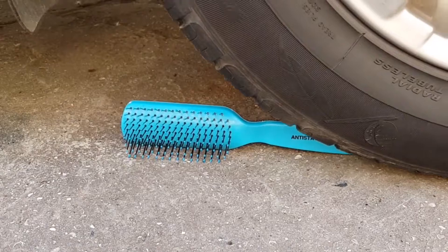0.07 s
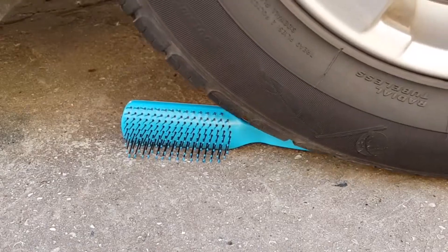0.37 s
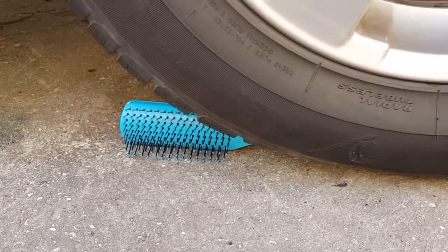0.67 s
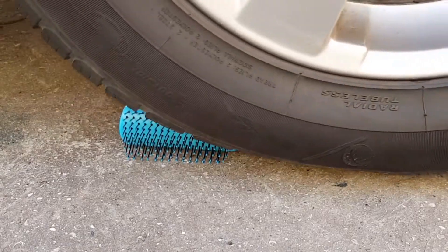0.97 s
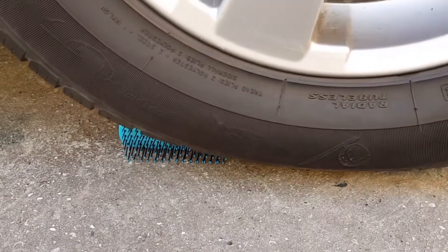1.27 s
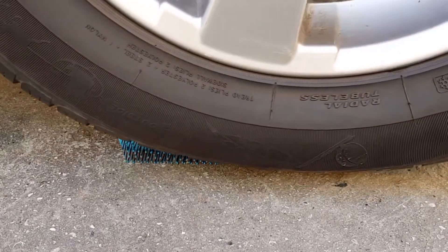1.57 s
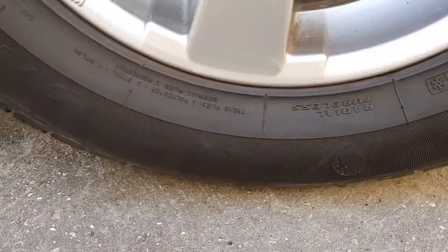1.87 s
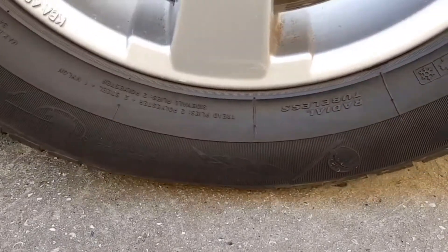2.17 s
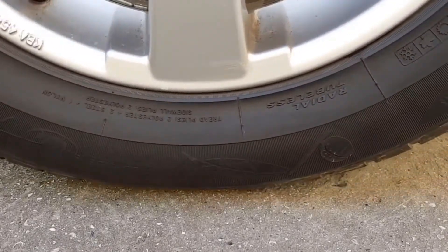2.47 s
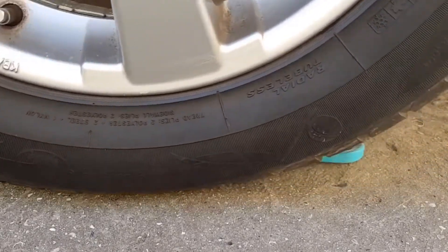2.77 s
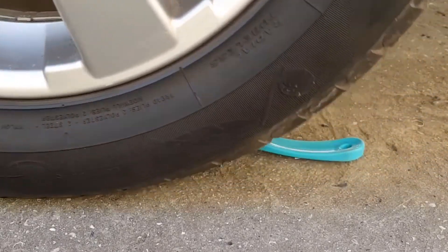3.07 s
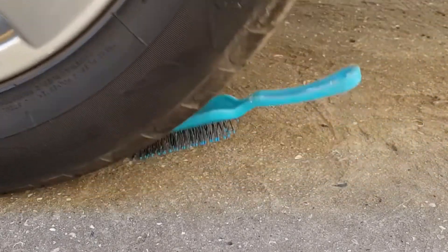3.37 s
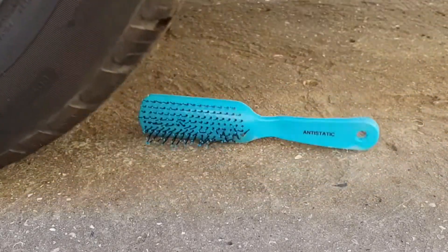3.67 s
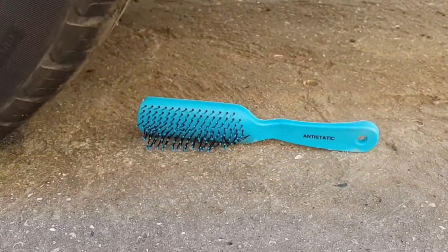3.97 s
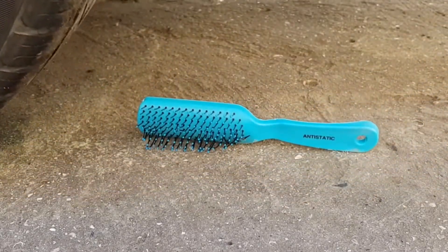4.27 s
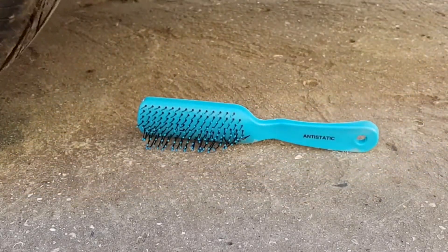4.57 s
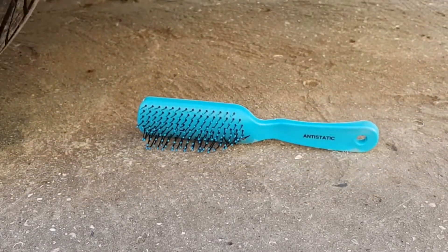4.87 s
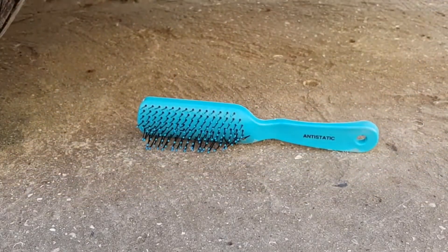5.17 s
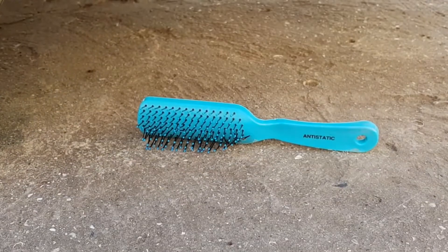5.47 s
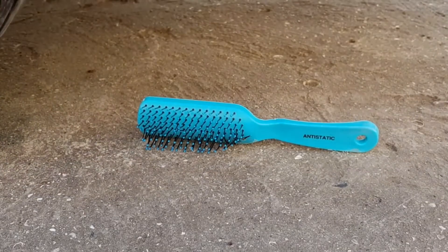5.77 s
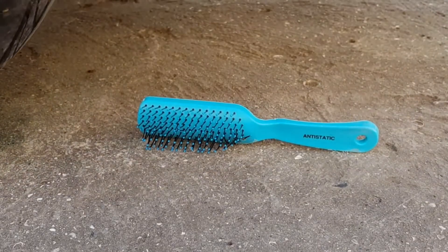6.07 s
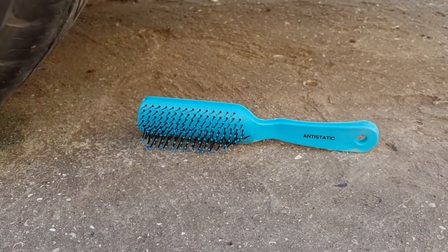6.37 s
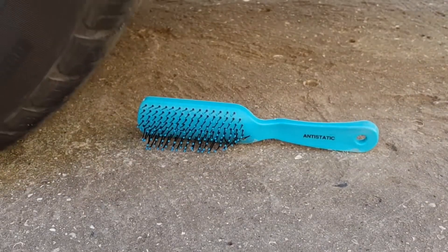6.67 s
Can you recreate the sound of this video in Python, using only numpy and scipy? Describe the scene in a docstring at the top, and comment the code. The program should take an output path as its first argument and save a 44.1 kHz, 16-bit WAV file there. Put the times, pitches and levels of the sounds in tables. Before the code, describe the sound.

A car idles and creeps over a plastic hairbrush, which gives one loud crack, then scrapes and clatters lightly on concrete.

```python
"""A four-cylinder engine idles close by while the car creeps onto a plastic hairbrush on concrete. After a few
ticks the brush gives with one loud crack: the pinned plastic rings, the tyre thumps down, its air cavity hums,
and the automatic gain control ducks. The tyre scrapes on the concrete, the freed brush flicks its bristles and
clatters, while the engine changes colour as the wheel passes. As the gain eases back, the engine sags twice
under the clutch, the second time deeper and with a shudder, then picks up again."""
import sys
import numpy as np
from scipy import signal
from scipy.fft import rfft, irfft, next_fast_len
from scipy.io import wavfile
from scipy.ndimage import uniform_filter1d, minimum_filter1d, map_coordinates

SR = 44100
rng = np.random.default_rng(int(sys.argv[2]) if len(sys.argv) > 2 else 0)


def master(y):
    """Save y as 16-bit WAV."""
    cut = np.clip(np.atleast_2d(y).T, -1, 1)
    pcm = np.round(cut * 32767)  # scale
    wavfile.write(sys.argv[1], SR, pcm.astype(np.int16))


N = 306054

# Table levels are relative, within their own layer.
# the run of snaps as the brush gives way: t/s, level/dB
BRUSH_SNAPS = [(1.9426, -1), (1.9449, -1.5), (1.9526, -11), (1.957, -7), (1.972, -16)]
# pop of the air pushed out by each snap: f/Hz, level/dB, t60/s
POP_MODES = [(277, -5, 0.015), (763, 3, 0.019), (1070, -8.5, 0.0066)]
# ring of the brush pinned under the tyre: f/Hz, level/dB, t60/s
PINNED_MODES = [(390, -15, .08), (535, -3, 0.15), (661, -3.5, 0.14), (757, 4.5, 0.098), (874, -8, 0.28),
                (923, -7, 0.13), (1044, -1, 0.1), (1270, -11, .04), (2060, -5, .07), (2440, -16, 0.088),
                (3050, -7.5, 0.043)]
# tyre carcass and air cavity: f/Hz, level/dB, t60/s
TYRE_MODES = [(62.6, 3, 0.174), (152, 3, 0.18), (223, -4, 0.84), (274, 2.5, .09)]
# colour of the bang scattered under the car: f/Hz, level/dB
SCATTER_EQ = [(30, -15), (60, 5.5), (130, 4.5), (260, 3.5), (480, -3.5), (620, 1.5), (780, -0.5),
              (1020, -8), (1250, -13), (1600, -22.5), (2060, -15.5), (3050, -20), (3900, -29), (6800, -29),
              (8000, -38), (11500, -33.5), (15500, -56)]
# hits of grit, bristles and the loose brush: t/s, click level/dB, pitch/Hz, t60/s, handle ring/dB
CONTACTS = [(1.034, -42.5, 7000, .09, -70), (1.205, -42, 7000, .03, -70), (1.4605, -25, 11000, 0.0068, -70),
            (1.803, -38, 10000, .01, -70), (2.296, -32.5, 4500, 0.026, -53), (2.364, -37, 5500, .02, -60),
            (2.484, -39, 8000, .03, -70), (2.526, -38, 8000, 0.016, -72), (2.597, -39, 6570, 0.022, -70),
            (2.645, -41, 8030, .02, -70), (3.182, -26.5, 1800, .014, -42), (3.386, -36, 4996, 0.022, -60),
            (3.421, -22.5, 4500, 0.013, -44), (3.617, -19.5, 4800, .024, -27),
            (3.696, -39, 9100, 0.043, -70), (3.757, -25.5, 1900, .015, -30)]
# colour of a hard contact: f/Hz, level/dB
CLICK_EQ = [(200, 9), (900, 8), (2500, -5.5), (3400, -5), (4800, -4.5), (7000, -9.5), (8500, -12.5),
            (15500, -8.5)]
# ring of the free handle: f/Hz, level/dB, t60/s
HANDLE_MODES = [(560, 8, 0.038), (1560, -2, .035), (1970, 1, .045), (2250, 0, .03), (2554, -1, 0.046),
                (4030, -5, 0.03), (4800, -2.5, .04), (7250, -1, .03)]
# the tyre scrapes on concrete as the tread lets go: peak t/s, level/dB, time to rise 20 dB/s
TYRE_SCRAPES = [(3.09, -45, .25), (3.19, -44, 0.13), (3.39, -45, .35), (3.63, -46, .12)]
# tufts of bristles springing back: peak t/s, level/dB
BRISTLE_FLICKS = [(3.19, -49), (3.437, -36), (3.628, -45)]

# the clutch drags the engine down: start t/s, slowest t/s, recovered t/s, firing rate drop/Hz
CLUTCH_SAGS = [(4.049, 4.47, 4.8, 1.5), (5.6, 6.249, 6.88, 5.2)]
# exhaust partials: multiple of the firing rate, level/dB
EXHAUST_PARTIALS = [(2.5, -8), (3, 0), (3.5, -11), (4, -7), (4.5, -6), (5, -7.5), (5.5, -7), (6, -9),
                    (6.5, -10), (7, -8), (8, -11.5), (9.5, -10.5), (10, -15.5)]
# colour of the exhaust puffs: f/Hz, level/dB
PUFF_EQ = [(20, -27), (50, -1.5), (70, -2.5), (100, 0.5), (170, 0.5), (250, -6), (360, -5), (420, -17.5),
           (600, -22), (1200, -75)]
# added exhaust colour once the wheel has passed: f/Hz, gain/dB
EXHAUST_EQ_AFTER = [(90, 3.5), (125, -4), (165, -2.5), (225, 3.5), (275, 0.5), (320, -6), (380, -0.5),
                    (600, 3)]
# engine bay noise before and after the wheel passes: f/Hz, level/dB
BAY_EQ_BEFORE = [(220, -22), (380, -7), (552, -5.5), (655, -3), (742, -6.5), (802, -3), (1150, -10),
                 (1260, -4.5), (1430, -11.5), (1720, -12.5), (3750, -21.5), (6880, -26), (8290, -32),
                 (12000, -29), (15700, -34.5)]
BAY_EQ_AFTER = [(220, -45), (380, -9), (411, -12.5), (488, -3), (606, -5.5), (666, -9.5), (719, -5),
                (1050, -7.5), (1450, -9), (1670, -10), (3580, -22.5), (6880, -27), (8040, -33),
                (12400, -30), (15700, -38)]
# ringing metal parts in the bay: f/Hz, half-width/Hz, boost/dB
METAL_RESONANCES = [(1680, 40, 3), (4900, 86, 3.5), (6940, 140, 2)]
# belt and pulley whine before and after the wheel passes: multiple of the firing rate, level/dB
WHINE_BEFORE = [(16.7, -11), (18.13, -11), (21.85, -10.5), (25.35, -13), (33.85, -13), (36, -22),
                (40.4, -21), (46.1, -16), (47.1, -16.5), (54.5, -22)]
WHINE_AFTER = [(18.13, -9.5), (21.75, -10.5), (36, -12), (49.3, -18), (51.2, -15)]
# the car body shakes as the clutch bites: t/s, f/Hz, level/dB, t60/s
BODY_THUDS = [(5.645, 55, -19, 0.28)]

# reverb decay of the yard: f/Hz, t60/s
YARD_DECAY = [(100, .2), (800, .2), (3000, 0.21), (12000, 0.097)]
# stereo width of the noise: f/Hz, left-right correlation
STEREO_LIKENESS = [(60, 0.96), (130, 0.91), (290, 0.79), (640, 0.63), (1400, 0.46), (3100, 0.17),
                   (15000, 0.12)]
# tilt of the image to the left: f/Hz, left minus right/dB
LEFT_TILT = [(60, 0.5), (200, 1), (700, 3), (2400, 2.5), (4400, 4), (15000, 5.5)]

IDLE_HZ = 37.7  # firing rate
PASS_S, PASS_TAKES_S = 2.0, 3.0  # wheel and wing move past and recolour the engine
UNCOVER_S, UNCOVER_TAKES_S = 2.34, 1.46  # the wheel uncovers the underside of the car
BAY_FADE_S, BAY_FADE_DB_PER_S = 4.21, 0.93  # the engine bay draws away
LUG_BELOW_HZ, LUG_RANGE_HZ = 36.63, 2.4  # lugging starts at this firing rate, is full this much lower
BODY_HZ, BODY_HALF_WIDTH_HZ = 66.5, 3  # car body resonance, met by the octave at low engine speed


def crack(peak_db, ring_db, scatter_db, thump_db):
    """The plastic snaps, the tyre drops, and the bang scatters between ground and underbody."""
    first_s = BRUSH_SNAPS[0][0]
    t = np.arange(SR) / SR
    snaps = [(t + first_s - s, db) for s, db in BRUSH_SNAPS]
    pops = sum(amp(db) * ring(POP_MODES, age) for age, db in snaps)
    bursts = sum(amp(db - 60 * np.abs(age) / 0.012) * (age >= 0) for age, db in snaps)
    splinter_eq = [(800, -17), (2000, 3.5), (3100, -2.0), (4000, -13), (6500, -8.5), (8000, -17),
                   (15500, -17)]
    attack = pops + amp(-11) * bursts * noise(splinter_eq, size=SR)
    plastic = amp(ring_db) * ring(PINNED_MODES, t - .0026) * (1 - np.exp(-t / 0.0034))
    # reflections build up for a moment, then die quickly
    bloom = np.minimum(t / 0.0099, 1) * amp(-60 * np.maximum(t - .018, 0) / 0.15)
    scatter = amp(scatter_db) * bloom * noise(SCATTER_EQ, size=SR)
    thump = amp(thump_db) * ring(TYRE_MODES, t - .006) * (1 - np.exp(-t / 0.0094))
    bang = attack / np.abs(attack).max() + plastic + scatter + thump
    out = np.zeros((2, N))
    add(out, first_s, amp(peak_db) * bang / np.abs(bang).max())
    return out


def clatter():
    """Hard little contacts: each clicks around its own pitch and rings the handle most near that pitch."""
    out = np.zeros((2, N))
    t = np.arange(SR // 8) / SR
    for s, db, pitch_hz, t60, ring_db in CONTACTS:
        bandpass = lambda hz: 1 / (1 + .7j * (hz / pitch_hz - pitch_hz / (hz + 1)))
        click = amp(db - 60 * t / t60) * unit(filtered(noise(CLICK_EQ, size=len(t)), bandpass))
        handle = amp(ring_db) * filtered(ring(HANDLE_MODES, t), bandpass)
        add(out, s, click + handle)
    return out


def bristles():
    """Bristles spring back in a bright, grainy spray; the tyre scrapes on concrete with a duller rasp."""
    springing = sum(swell(s, db, rise_s=0.053, fall_s=0.068) for s, db in BRISTLE_FLICKS)
    sliding = sum(swell(s, db, rise_s, fall_s=0.2) for s, db, rise_s in TYRE_SCRAPES)
    flick_eq = [(700, -19), (2500, -1), (5000, -3), (8000, -5), (12000, -3), (15500, -6)]
    scrape_eq = [(300, -16), (800, 2.0), (1400, -3.0), (2000, -8), (3000, -13), (8000, -28)]
    flicks = unit(amp(3.65 * wobble(700))) * noise(flick_eq)
    scrape = unit(amp(2.7 * wobble(300))) * noise(scrape_eq)
    return springing * flicks + sliding * scrape


def engine():
    """One firing rate drives boom, exhaust and bay; their mix follows engine speed and the car's creep."""
    t = np.arange(N) / SR
    firing_hz = firing_rate(sharpness=1.2)
    phase = 2 * np.pi * np.cumsum(firing_hz) / SR
    passed = np.clip((t - PASS_S) / PASS_TAKES_S, 0, 1)
    uncovered = np.clip((t - UNCOVER_S) / UNCOVER_TAKES_S, 0, 1)
    lug = np.clip((LUG_BELOW_HZ - firing_hz) / LUG_RANGE_HZ, 0, 1)
    tone_db = -32 + 5 * uncovered - 11 * lug
    octave_db = -35 + 1.5 * uncovered + 8 * bell(2 * firing_hz, BODY_HZ, BODY_HALF_WIDTH_HZ)
    exhaust_db = -35 + 4.5 * uncovered - 4 * lug
    bay_db = -42.5 - BAY_FADE_DB_PER_S * np.maximum(t - BAY_FADE_S, 0)
    return (boom(phase, tone_db, octave_db)
            + amp(exhaust_db) * exhaust(phase, passed)
            + amp(bay_db) * engine_bay(phase, passed))


def firing_rate(sharpness):
    """Firings a second: a near-steady idle with one rounded dip for each pull on the clutch."""
    t = np.arange(N) / SR
    sag_hz = np.zeros(N)
    for start, slowest, end, drop_hz in CLUTCH_SAGS:
        arc = np.interp(t, [start, slowest, end], [0, np.pi / 2, np.pi])
        sag_hz += drop_hz * np.abs(np.sin(arc)) ** sharpness
    return IDLE_HZ - sag_hz + .05 * wobble(2)


def boom(phase, tone_db, octave_db):
    """The low end: the firing tone and its octave, wavering a little differently left and right."""
    stereo_phase = phase + 0.19 * np.array([wobble(5), wobble(5.7)])
    tone = amp(tone_db + 0.66 * wobble(11)) * np.cos(stereo_phase)
    octave = amp(octave_db + 1.1 * wobble(13)) * np.cos(phase + stereo_phase)
    return -np.sqrt(2) * (tone + octave)


def exhaust(phase, passed):
    """Each firing puffs out rumble over a pitched drone; unequal cylinders add a half-rate lope."""
    puffs = amp(1.6 * np.cos(phase) + np.cos(phase / 2))
    rumble = unit(puffs * noise(PUFF_EQ))
    drone = unit(partials(EXHAUST_PARTIALS, phase, waver_db=1.56, drift=0.41, spread=1.52))
    before = amp(-2.0) * rumble - amp(-3.0) * drone
    after = filtered(before, lambda hz: amp(curve(EXHAUST_EQ_AFTER, hz)))
    return (1 - passed) * before + passed * after


def engine_bay(phase, passed):
    """Valves tap several times per firing, metal rings, belts whine; the colour shifts with the pass."""
    metal = lambda hz: amp(sum(db * bell(hz, centre, width) for centre, width, db in METAL_RESONANCES))
    wash = np.sqrt(1 - passed) * noise(BAY_EQ_BEFORE)
    wash += np.sqrt(passed) * filtered(noise(BAY_EQ_AFTER), metal)
    rhythm_db = 0.35 * np.cos(phase) + 0.2 * np.cos(phase / 2) + 0.64 * np.cos(3 * phase)
    taps = amp(rhythm_db + 0.79 * wobble(250) + 0.46 * wobble(12))
    valves = amp(3.0 - 0.28 * passed) * unit(wash * taps)
    whine_before = amp(3.0) * partials(WHINE_BEFORE, phase, waver_db=3.5, drift=0.37, spread=np.pi)
    whine_after = partials(WHINE_AFTER, phase, waver_db=3, drift=0.5, spread=np.pi)
    return valves + (1 - passed) * whine_before + passed * whine_after


def shudder():
    """The clutch bites and sends a soft low thud through the whole car."""
    t = np.arange(N) / SR
    return sum(ring([(hz, db, t60)], t - s) for s, hz, db, t60 in BODY_THUDS)


def yard(x):
    """A short reverb off nearby walls and the car body; the treble dies first."""
    hz, t, spectra = signal.stft(rng.standard_normal((2, SR // 2)), SR, nperseg=256)
    decay = amp(-60 * t / curve(YARD_DECAY, hz)[:, None])
    tail = signal.istft(spectra * decay, SR, nperseg=256)[1]
    return signal.fftconvolve(x, tail / np.linalg.norm(tail[0]), axes=1)[:, :N]


def pan(x, lag_s):
    """Tilts the level to the left and delays the right side by a share of lag_s."""
    # long waves come off ground and walls alike and keep less of the lag
    lag_share = [(150, 0.11), (700, 0.84), (2000, 0.97)]
    delay = lambda hz: np.exp(-2j * np.pi * hz * lag_s * curve(lag_share, hz))
    left = filtered(x[0], lambda hz: amp(curve(LEFT_TILT, hz) / 2))
    right = filtered(x[1], lambda hz: amp(-curve(LEFT_TILT, hz) / 2) * delay(hz))
    return np.array([left, right])


def gain_control(x, ceiling, hold_s, release_s):
    """Ducks just ahead of a peak, holds that gain, then eases back."""
    ahead = SR // 150
    t = np.arange(N) / SR
    duck_db = 20 * np.log10(np.minimum(1, ceiling / (np.abs(x).max(axis=0) + 1e-9)))
    hold = int(hold_s * SR) // 2 * 2 + 1
    held_db = minimum_filter1d(duck_db, hold, origin=hold // 2, mode="nearest")
    release = np.exp(-t / release_s)
    gain_db = np.minimum.accumulate(held_db / release) * release
    early_db = np.pad(gain_db[ahead:], (0, ahead), mode="edge")
    return x * amp(uniform_filter1d(early_db, ahead))


def ring(modes, t):
    """Damped modes, silent before t = 0."""
    t = np.maximum(t, 0)
    return sum(amp(db - 60 * t / t60) * np.sin(2 * np.pi * hz * t) for hz, db, t60 in modes)


def partials(table, phase, waver_db, drift, spread):
    """Unsteady tones locked to the crankshaft; drift and spread are moving and fixed phase offsets."""
    return sum(amp(db + waver_db * wobble(7))
               * np.cos(multiple * phase + drift * wobble(5) + spread * rng.standard_normal())
               for multiple, db in table)


def noise(eq, size=N):
    """Stereo noise of rms 1, coloured by (f/Hz, level/dB) points; near mono in the bass."""
    width = lambda hz: np.arccos(np.clip(curve(STEREO_LIKENESS, hz), -1, 1)) / 2
    colour = lambda hz: amp(curve(eq, hz)) * [np.cos(width(hz)), np.sin(width(hz))]
    mid, side = filtered(rng.standard_normal((2, size)), colour)
    return unit(np.array([mid + side, mid - side]))


def swell(s, db, rise_s, fall_s):
    """An envelope that peaks at s; it climbs 20 dB in rise_s and drops 20 dB in fall_s."""
    t = np.arange(N) / SR - s
    return amp(db) * 10 ** -np.minimum(np.maximum(-t / rise_s, t / fall_s), 10)


def wobble(rate):
    """Smooth random modulation, rate knots a second."""
    grid = np.arange(0, N * rate / SR + 1, .125)
    smooth = map_coordinates(rng.standard_normal(int(grid[-1]) + 4), [grid])
    return np.interp(np.arange(N) * (rate / SR), grid, smooth)


def filtered(x, response):
    """x through a complex frequency response."""
    n = x.shape[-1]
    padded = next_fast_len(n + 8192)
    return irfft(rfft(x, padded) * response(np.fft.rfftfreq(padded, 1 / SR)), padded)[..., :n]


def bell(hz, centre, half_width):
    """A resonance peak of height 1."""
    return 1 / (1 + ((hz - centre) / half_width) ** 2)


def curve(points, hz):
    """Joins (f/Hz, value) points on a log frequency axis."""
    freqs, values = np.transpose(points)
    return np.interp(np.log(hz + 1), np.log(freqs + 1), values)


def add(track, s, sound):
    """Mixes a sound in at s seconds."""
    part = track[..., round(s * SR):][..., :sound.shape[-1]]
    part += sound[..., :part.shape[-1]]


def amp(db):
    """Decibels to gain."""
    return np.exp(np.asarray(db) * (np.log(10) / 20))


def unit(x):
    """Scaled to rms 1."""
    return x / np.sqrt(np.mean(x ** 2) + 1e-20)


def scene():
    """The engine sits to the left, the brush lies nearly straight ahead."""
    brush = clatter() + bristles()
    bang = crack(peak_db=17.0, ring_db=-16.5, scatter_db=-12.0, thump_db=-14.0)
    car = engine() + shudder()
    foreground = bang + brush + amp(-7.0) * yard(brush)
    return pan(car, lag_s=0.000423) + pan(foreground, lag_s=-0.000065)


def record(dry):
    """The sound opens after a moment of silence, ducks under the crack and loses its very top."""
    start_s, fade_in_s, top_hz = .083, 0.0044, 15850
    fade_in = np.clip((np.arange(N) / SR - start_s) / fade_in_s, 0, 1)
    ducked = gain_control(dry, ceiling=.97, hold_s=2.168, release_s=0.72)
    return filtered(fade_in * ducked, lambda hz: hz < top_hz)


dry = scene()
out = record(dry)
master(out)
```